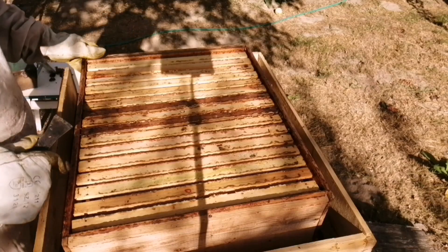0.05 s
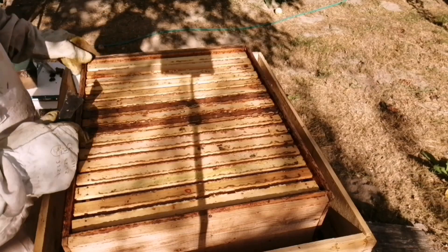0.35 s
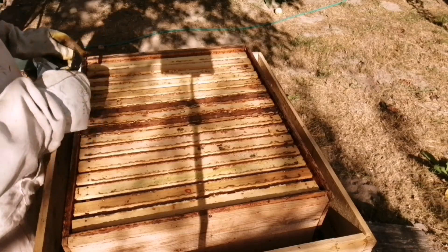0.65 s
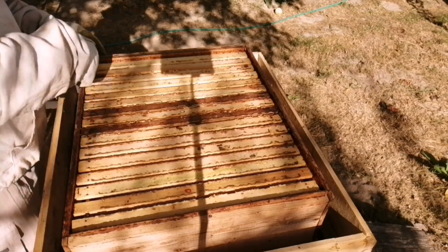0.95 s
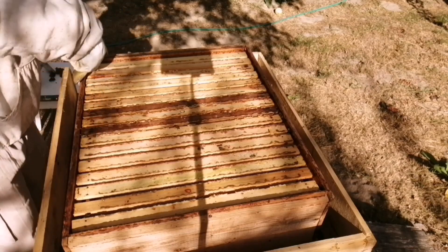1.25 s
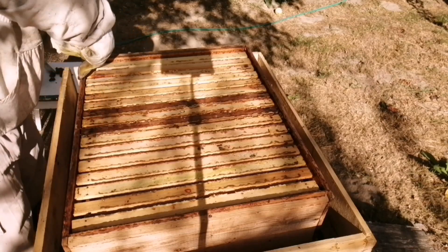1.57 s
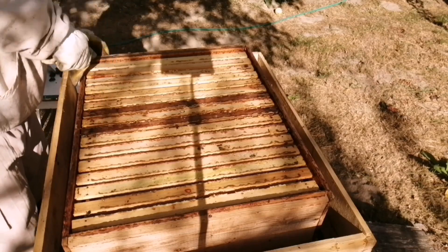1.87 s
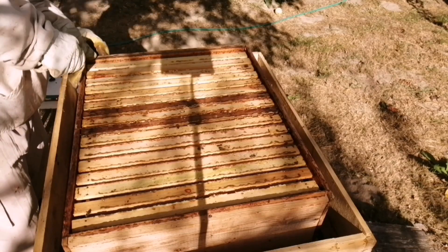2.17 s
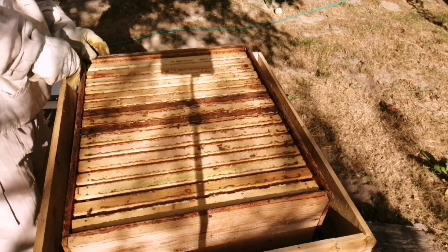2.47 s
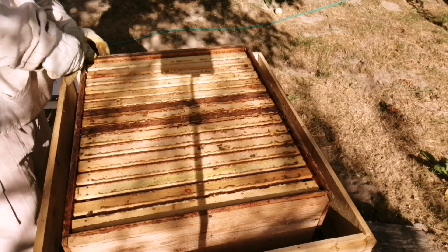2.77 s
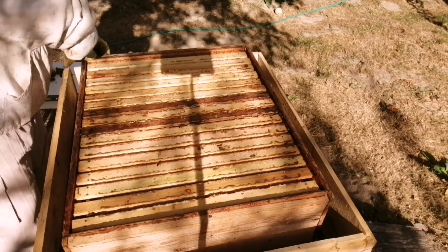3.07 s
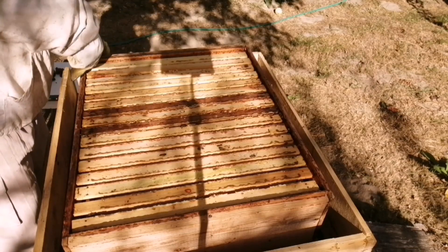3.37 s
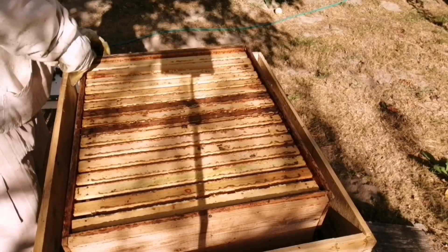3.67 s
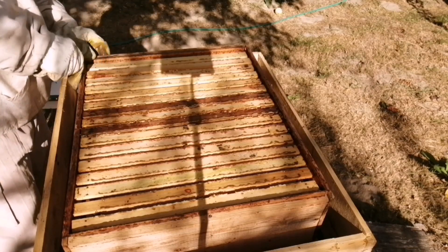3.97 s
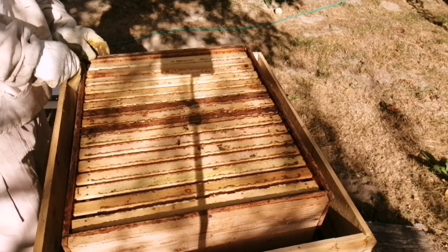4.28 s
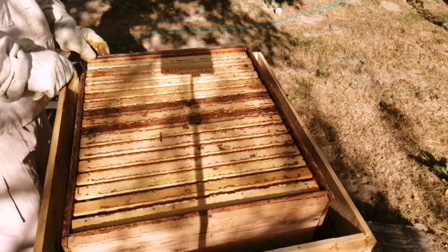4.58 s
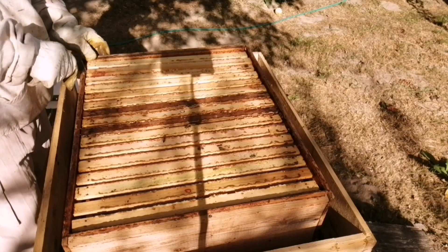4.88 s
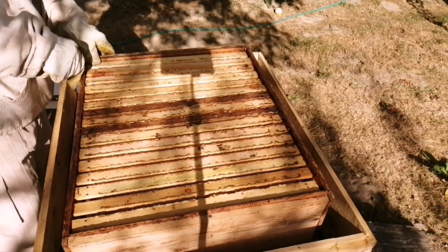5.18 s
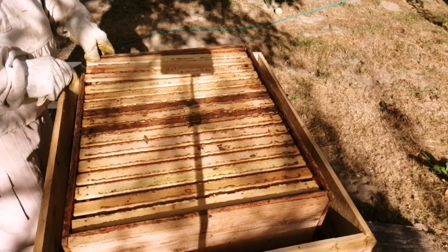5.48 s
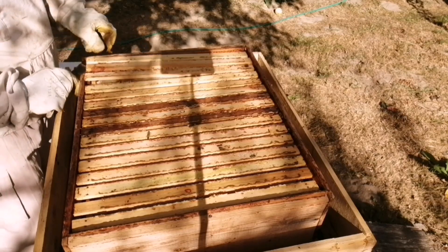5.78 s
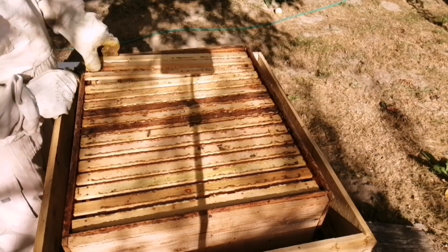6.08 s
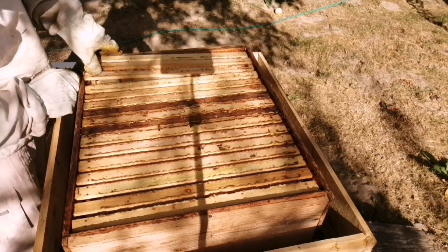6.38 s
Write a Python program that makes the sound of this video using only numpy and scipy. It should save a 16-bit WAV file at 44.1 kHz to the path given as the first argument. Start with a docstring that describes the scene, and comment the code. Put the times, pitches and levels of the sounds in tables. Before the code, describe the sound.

Outdoors, bees murmur softly under the fast, high chirping and dry rasping of grass insects. Close by, a steel tool works frames free in a wooden hive: a cluster of crisp snaps, a louder double crack, a dull thump from the box, then a last sharp knock. The low hum slowly fades while the insects carry on, with small puffs of wind on the microphone and a soft background rush.

```python
"""A beekeeper prises wooden frames loose in an open hive on dry summer grass.
The bee glue (propolis) snaps and sets the steel tool ringing, the frames drag and knock and the hollow
box thumps. Beating wings make the colony murmur over a low hum. A bush cricket and a grasshopper
call in the crackling grass, and a dry, high rasp swells briefly now and then.
Light wind rumbles on the microphone over a soft background rush."""
import sys
import numpy as np
from scipy import signal
from scipy.fft import rfft, irfft
from scipy.io import wavfile

SR = 44100
rng = np.random.default_rng(int(sys.argv[2]) if len(sys.argv) > 2 else 0)


def wav_record(signal):
    """Record a signal, one row per channel, as 16-bit PCM in the file named by sys.argv[1]."""
    frames = np.transpose(np.atleast_2d(signal))
    bounded = np.clip(frames, -1, 1)
    # unit amplitude maps onto the largest positive 16-bit level
    quanta = np.round(bounded * 32767).astype(np.int16)
    wavfile.write(sys.argv[1], SR, quanta)


N = 288395
T = np.arange(N) / SR


# The snaps' tone colour, with a bright microphone peak near 15 kHz.
# Each row: frequency in Hz, level in dB.
SNAP_SPECTRUM = [(300, -3.5), (1000, 5), (1800, 0), (3100, 3.5), (4000, -0.5), (5200, 7), (7200, 1.5),
                 (9000, -9.5), (12000, -5), (14000, -9), (15100, 3), (15800, -7)]
# The steel tool's ringing tones. Each row: pitch in Hz, level in dB, ring time in seconds if not held.
TOOL_MODES = [(5210, -5.5, 0.028), (5160, -18, 0.022), (3300, -20, 0.068), (7180, -6, 0.035)]
# The snaps. Each row: start in seconds, level in dB, seconds to fade by 60 dB, extra treble in dB.
SNAPS = [(2.518, -42, 0.018, 5), (2.5296, -28, 0.016, 4), (2.578, -41.5, 0.0098, -2),
         (2.8175, -24.5, 0.038, 2.5), (2.880, -24, 0.012, 4), (4.0841, -24.5, 0.015, -2),
         (4.1171, -13.5, 0.0095, -3), (4.128, -39, 0.014, -5), (4.136, -47, 0.016, -11),
         (4.475, -66, 0.012, -2), (4.931, -44.5, 0.13, -18), (5.81, -32, 0.038, -6), (6.149, -42, 0.011, 3)]
# A loose frame drags along its ledge. Each row: start in seconds, end in seconds, level in dB.
FRAME_DRAGS = [(2.813, 2.892, -49), (4.09, 4.137, -44)]

def propolis(rise_s=.0009, treble_hz=8500, scatter_db=-36.5, scatter_t60=.19):
    """Brittle glue snaps in bursts of grainy noise, the tool rings and the freed frame drags."""
    out, age = np.zeros((2, N)), np.arange(SR // 4) / SR
    grain = rms_one(noise(SNAP_SPECTRUM) * from_db(1.5 * drift(500)))
    treble = signal.sosfiltfilt(signal.butter(2, treble_hz, "high", fs=SR, output="sos"), grain)
    rise = 1 - np.exp(-(age / rise_s) ** 2)
    for s, db, t60, treble_db in SNAPS:
        part = slice(round(s * SR), round(s * SR) + len(age))
        burst = grain[:, part] + (from_db(treble_db) - 1) * treble[:, part]
        scatter = from_db(scatter_db - 60 * age / scatter_t60)  # off the hive walls and the ground
        fade = from_db(-60 * age / t60) + scatter
        tool = struck(TOOL_MODES, age, colour_db=-5.5, vary_db=7.5, rise_s=rise_s, ring_scale=.65)
        add(out, s, from_db(db) * (burst * rise * fade + tool))
    for start, end, db in FRAME_DRAGS:
        attack = np.clip((T - start) / .004, 0, 1)
        release_db = -60 * np.clip((T - end) / .068, 0, 2)
        out += grain * attack * from_db(db + release_db)
    return out


# A frame's ringing tones. Each row: pitch in Hz, level in dB, ring time in seconds if not held.
FRAME_MODES = [(233, -14, 0.2), (292, -4.5, 0.15), (364, 1.5, 0.1), (421, -9, 0.1), (542, -4, 0.12),
               (635, 19.5, 0.015), (727, -4.5, 0.084), (810, -2.5, 0.12), (914, -1.5, 0.12),
               (947, -6.5, 0.12), (1088, -13, 0.23), (1324, -1.5, 0.055), (1654, -1, 0.046),
               (1837, 2.5, 0.057), (2140, -7, 0.12), (2456, -6, 0.12), (3116, -3, 0.087)]
# The knocks. Each row: start in seconds, level in dB, tilt in dB per octave, most excited pitch in Hz,
# its boost in dB, how much the grip multiplies the ring time, left minus right in dB.
FRAME_KNOCKS = [(2.089, -63, 1.5, 2050, 8, 0.9, 0), (2.148, -59.5, 4, 1080, 18, 0.64, -2),
                (2.529, -51, -2, 1870, 11, 0.66, 2), (2.819, -42, 0, 930, 11.5, 0.43, 2),
                (2.826, -55.5, -8, 300, 5, 0.93, 2), (2.881, -36.5, -2, 976, 10.5, 0.38, 0),
                (2.888, -54, -9, 269, 12.5, 1.03, 4.5), (3.169, -51, -7.5, 930, 15.5, 0.47, 1),
                (3.172, -52.5, -6.5, 327, 10.5, 0.63, -2), (4.085, -33.5, -2, 920, 7, 0.51, 5),
                (4.089, -39.5, -5.5, 322, 14.5, 0.61, 1), (4.118, -26.5, -3, 717, 13.5, 0.26, 1),
                (4.121, -36.5, -3, 574, 12.5, .6, 0), (4.926, -47, -6.5, 770, 14, 0.64, 3),
                (4.929, -43.5, -5, 306, 9.5, 0.71, 1), (5.814, -32.5, 1, 1580, 10, 0.18, -0.5),
                (5.820, -45, -2, 295, 8, 0.64, 1)]

def frame_knocks(grip_shift=.008, build_cycles=1.29):
    """A frame hits its ledge and rings. Low tones take longer to build up, so the high ones come first."""
    out, age = np.zeros((2, N)), np.arange(SR // 6) / SR
    for s, db, tilt_db, centre_hz, boost_db, grip, side_db in FRAME_KNOCKS:
        # the grip shifts each pitch a little from knock to knock
        modes = [(hz * (1 + grip_shift * rng.standard_normal()), level, t60)
                 for hz, level, t60 in FRAME_MODES]
        modes += crowded_modes()
        hz = np.array(modes)[:, :1]
        # a harder contact tilts the ring towards its higher tones
        colour_db = tilt_db * np.log2(hz / 800) + contact_boost(modes, centre_hz, boost_db)
        ring = struck(modes, age, colour_db, vary_db=1, rise_s=build_cycles / hz, ring_scale=grip)
        add(out, s, from_db(db) * ring * panned(side_db))
    return out


def crowded_modes(count=26, low_hz=514, high_hz=3398, db=-11, t60=.088):
    """The frame's many weak middle tones, different at every contact."""
    places = (np.arange(count) + rng.random(count)) / count
    return [(low_hz + (high_hz - low_hz) * place, db, t60) for place in places]


# The box's tones. Each row: pitch in Hz, level in dB, ring time in seconds before ring_scale.
BOX_MODES = [(85, 3, 0.26), (139, -2, 0.22), (161.5, 6, 0.17), (212, 13.5, 0.078), (305, 16, 0.037)]
# Jolts to the box. Each row: start in seconds, level in dB, most excited pitch in Hz.
BOX_JOLTS = [(2.53, -70, 280), (2.887, -66, 230), (3.169, -58, 230), (4.122, -51.5, 136), (4.74, -62.5, 90),
             (4.926, -42.5, 85), (5.817, -47, 145), (5.848, -62, 130)]

def box_thumps():
    """The hollow box answers each jolt with a slow, low thump."""
    out, age = np.zeros((2, N)), np.arange(SR // 4) / SR
    for s, db, centre_hz in BOX_JOLTS:
        colour_db = contact_boost(BOX_MODES, centre_hz, boost_db=7)
        thump = struck(BOX_MODES, age, colour_db, vary_db=2.5, rise_s=.011, ring_scale=.9)
        add(out, s, from_db(db) * thump)
    return out * panned(2)


# The tones in a bee's buzz. Each row: multiple of the wingbeat rate, level in dB.
WING_HARMONICS = [(1, -1.5), (2, -1), (3, -6.5), (4, -9), (5, -14), (6, -15)]

def bees(count, spread, wander, flutter_db, wingbeat_hz=244.8):
    """Each bee beats its wings at its own wandering pitch and swells as it moves."""
    out, turn = np.zeros((2, N)), np.arange(1024) / 1024
    for offset in np.linspace(-1, 1, count):
        hz = wingbeat_hz * (1 + spread * offset * abs(offset) + wander * drift(4))
        one_beat = sum(from_db(db) * np.sin(2 * np.pi * (multiple * turn + rng.random()))
                       for multiple, db in WING_HARMONICS)
        beats = np.cumsum(hz) / SR
        wing = one_beat[(beats * len(turn)).astype(int) % len(turn)]
        out += wing * from_db(flutter_db * drift(3.75)) * panned(rng.normal(0, 5))
    buzz = rms_one(out)
    cavity = rms_one(resonance(buzz, hz=510, width_hz=170))  # the gaps between the combs boost one band
    return rms_one(buzz + .1 * cavity)


# The low hum swells, then fades. Each row: time in seconds, level in dB.
HUM_LEVEL = [(0, -69.5), (0.7, -67.5), (2.1, -65.5), (2.8, -69.5), (6.54, -74)]

def hum(hz=150.7, waver_hz=.4):
    """A low, nearly pure tone that wavers a little."""
    turns = np.cumsum(hz + waver_hz * drift(5.5)) / SR
    tone = np.sqrt(2) * np.sin(2 * np.pi * turns)
    return tone * from_db(in_time(HUM_LEVEL)) * panned(-4.5)


# The cricket's pace. Each row: time in seconds, chirps per second.
CHIRP_RATE = [(0, 11.12), (1.5, 11.07), (2.2, 10.7), (2.5, 9.35), (2.75, 11.45), (4.2, 11.2), (5.8, 11.27),
              (6.54, 11)]

def cricket(hz=9220, width_hz=1300):
    """A bush cricket makes its wing ring with two quick strokes per chirp."""
    turns = np.cumsum(in_time(CHIRP_RATE)) / SR
    strokes = pulse(turns, centre=.14, width=.038) + pulse(turns, centre=.441, width=.038)
    scrape = rng.standard_normal((2, N))
    wing = rms_one(resonance(resonance(scrape, hz, width_hz), hz, width_hz))
    return wing * strokes * from_db(2.4 * drift(22)) * panned(10)


# The tone colour of a dry, high rasp. Each row: frequency in Hz, level in dB.
RASP_SPECTRUM = [(2000, -11.5), (2900, 4), (3400, 2.5), (3900, -7), (5100, 4), (6500, 0.5), (7200, 6.5),
                 (7900, -1), (8700, 6.5), (10000, 5.5), (12300, -2.5), (14000, -4), (15000, 4.5),
                 (15800, -13)]
# The grasshopper's pace. Each row: time in seconds, strokes per second.
STROKE_RATE = [(0, 13.3), (1.1, 13.15), (1.4, 12.85), (2.3, 12.95), (2.7, 13.3), (4.4, 13.15), (6.54, 13.4)]
# How hard it rasps. Each row: time in seconds, level in dB.
STROKE_LEVEL = [(0, -58), (1.2, -55), (2.4, -57.5), (3.4, -57), (4.5, -60), (5.4, -58), (6.54, -56.5)]

def grasshopper(jitter_cycles=.08, rest_depth=.65, skip_depth=.7):
    """A leg rasps along the wing in uneven strokes, eases off between them and now and then skips."""
    turns = np.cumsum(in_time(STROKE_RATE)) / SR + jitter_cycles * drift(27)
    strokes = (1 - rest_depth * pulse(turns, centre=.39, width=.15)) * from_db(drift(44))
    contact = 1 - skip_depth * np.clip(2 * drift(30) - 1, 0, 1)
    teeth = noise(RASP_SPECTRUM) * from_db(1.5 * drift(44))
    return rms_one(teeth * strokes * contact) * from_db(in_time(STROKE_LEVEL)) * panned(.3)


# Brief louder swells in the dry, high rasp. Each row: time of the peak in seconds, level in dB.
RASP_PEAKS = [(0.279, -54), (1.513, -50), (2.738, -51), (3.055, -54), (3.413, -57), (4.377, -50.5),
              (4.751, -48.5), (5.36, -49.5), (6.057, -53), (6.472, -49.5)]

def rasp_swells(floor_db=-70.5):
    """A dry, high rasp flickers faintly all the time and swells briefly now and then."""
    swells = sum(from_db(db) * swell(s, rise_s=.0043, fall_s=.0094) for s, db in RASP_PEAKS)
    flicker = from_db(floor_db + 3 * drift(31))
    return (swells + flicker) * noise(RASP_SPECTRUM)


def crackle(ticks_per_s=60, spread_db=3, t60=.012):
    """Dry grass and cloth give tiny ticks at random moments, a few standing out."""
    sizes = from_db(spread_db * np.minimum(rng.exponential(1, N), 3))
    ticks = sizes * (rng.random(N) < ticks_per_s / SR)
    fades = signal.lfilter([1], [1, -from_db(-60 / (t60 * SR))], ticks + 1e-18)
    return rms_one(fades * noise(SNAP_SPECTRUM))


# The wind's rumble. Each row: frequency in Hz, level in dB.
WIND_SPECTRUM = [(15, -5.5), (35, 7), (70, -2.5), (110, -10), (200, -21), (500, -72)]
# The breeze. Each row: time in seconds, level in dB before lift_db is added.
BREEZE_LEVEL = [(0.0, -58.5), (0.84, -71), (1.69, -72), (2.26, -75), (2.64, -64.5), (3.68, -67.5),
                (4.35, -65.5), (5.1, -80), (6.54, -72.5)]
# Single puffs. Each row: time of the peak in seconds, level in dB.
WIND_PUFFS = [(0.01, -53), (0.11, -45.5), (0.51, -62), (1.49, -51), (2.51, -55.5), (2.62, -51), (3.02, -64),
              (3.37, -57), (3.92, -56.5), (4.28, -53.5), (4.6, -53.5)]

def wind(lift_db=4.5, eddy_db=2, lumps_db=1.5):
    """A swirling breeze and short puffs hit the microphone and make a lumpy rumble."""
    breeze = from_db(in_time(BREEZE_LEVEL) + lift_db + eddy_db * drift(.55))
    puffs = sum(from_db(db) * swell(s, rise_s=.032, fall_s=.028) for s, db in WIND_PUFFS)
    rumble = rms_one(noise(WIND_SPECTRUM) * from_db(lumps_db * drift(25)))
    return np.hypot(breeze, puffs) * rumble * panned(1.5)


# A soft background rush. Each row: frequency in Hz, level in dB; little is heard near 4 kHz.
RUSH_SPECTRUM = [(60, -6), (130, 4), (350, 4), (620, 0.5), (1000, -3.5), (1500, -5.5), (2000, -9),
                 (2900, -2), (3400, -25), (3900, -63), (5000, -7.5)]
# The hiss of far-off insects. Each row: frequency in Hz, level in dB.
HISS_SPECTRUM = [(3000, -30), (4200, -10), (5200, 0), (9300, 6), (12500, -7), (15000, -1), (15800, -8)]

def background(rush_db=-60.5, insects_db=-64):
    """A soft, flickering rush and the steady hiss of far-off insects."""
    rush = noise(RUSH_SPECTRUM) * from_db(rush_db + 2.05 * drift(31))
    return rush + from_db(insects_db) * noise(HISS_SPECTRUM)


# How alike left and right sound. Each row: frequency in Hz, likeness (1 means the same).
STEREO_LIKENESS = [(30, 0.065), (150, 0.8), (300, 0.93), (700, 0.47), (2000, 0.17), (5000, 0.043),
                   (15000, 0.058)]

def noise(spectrum, top_hz=15800):
    """Stereo noise of a given colour at power 1, most alike on both sides near 300 Hz."""
    hz = np.arange(N // 2 + 1) * SR / N
    mid, side = rfft(rng.standard_normal((2, N)))
    alike = at_hz(STEREO_LIKENESS, hz)
    both = np.sqrt(1 + alike) * mid + np.sqrt(1 - alike) * side * [[1], [-1]]
    return rms_one(irfft(both * from_db(at_hz(spectrum, hz)) * (hz < top_hz), N))


def struck(modes, age, colour_db, vary_db, rise_s, ring_scale):
    """A struck object rings with its own tones (modes). Ring time, t60, is the time to fade by 60 dB."""
    hz, db, t60 = np.transpose(modes)[:, :, None]
    gain = from_db(db + colour_db + vary_db * rng.standard_normal(hz.shape))
    # the tones reach left and right out of step
    apart = np.arccos(at_hz(STEREO_LIKENESS, hz)) * rng.choice([-.5, .5], hz.shape)
    phase = 2 * np.pi * (hz * age + rng.random(hz.shape))
    rise = 1 - np.exp(-(age / rise_s) ** 2)
    fade = from_db(-60 * age / (t60 * ring_scale))
    return np.array([(gain * rise * fade * np.sin(phase + side * apart)).sum(0) for side in (1, -1)])


def contact_boost(modes, centre_hz, boost_db, octaves=.19):
    """Extra dB for each tone: the spot that is hit favours those near one pitch."""
    return boost_db * np.exp(-(np.log2(np.array(modes)[:, :1] / centre_hz) / octaves) ** 2)


def resonance(x, hz, width_hz):
    """A filter that rings at one pitch."""
    r = np.exp(-np.pi * width_hz / SR)
    return signal.lfilter([1, 0, -1], [1, -2 * r * np.cos(2 * np.pi * hz / SR), r * r], x)


def drift(hz):
    """A smooth random wobble of size about 1; more hz makes it quicker."""
    r = np.exp(-80 * np.pi * hz / SR)
    steps = rng.standard_normal(N // 40 + 2002)  # one for every 40 samples
    slow = signal.lfilter([1], [1, -2 * r, r * r], steps)[2000:]
    return np.interp(np.arange(N) / 40, np.arange(len(slow)), rms_one(slow))


def pulse(turns, centre, width):
    """One smooth bump in every cycle."""
    return np.exp(-.5 * (((turns - centre + .5) % 1 - .5) / width) ** 2)


def swell(s, rise_s, fall_s):
    """A smooth bump of height 1 that peaks at time s."""
    return np.exp(-.5 * np.minimum(abs(T - s) / np.where(T < s, rise_s, fall_s), 10) ** 2)


def in_time(rows):
    """A curve's value at every sample."""
    return np.interp(T, *np.transpose(rows))


def at_hz(points, hz):
    """Read a spectrum between its rows, on an octave scale."""
    f, value = np.transpose(points)
    return np.interp(np.log(np.maximum(hz, 1)), np.log(f), value)


def from_db(db):
    """Decibels to gain."""
    return 10 ** (np.asarray(db) / 20)


def rms_one(x):
    """Scale to an average power of 1."""
    return x / np.sqrt(np.mean(x ** 2) + 1e-20)


def panned(side_db):
    """Left and right gains, with the left louder by side_db."""
    return from_db(np.array([[.5], [-.5]]) * side_db)


def add(out, s, sound):
    """Mix a sound in from time s."""
    start = round(s * SR)
    out[:, start:start + sound.shape[1]] += sound


def scene():
    """The beekeeper and the hive in front; insects, wind and a soft rush behind."""
    keeper = propolis() + frame_knocks() + box_thumps()
    rasp = rasp_swells()
    colony = from_db(-65.5) * bees(count=8, spread=.12, wander=.03, flutter_db=2.5) + hum()
    near_bees = from_db(-72) * bees(count=2, spread=.025, wander=.035, flutter_db=6)
    grass = from_db(-54) * cricket() + grasshopper() + from_db(-71) * crackle()
    return keeper + colony + near_bees + grass + rasp + wind() + background()


def record(dry):
    """Cut the rumble below 16 Hz and the treble above 15800 Hz."""
    dry = signal.sosfilt(signal.butter(2, 16, "high", fs=SR, output="sos"), dry)
    return signal.sosfilt(signal.ellip(10, .2, 70, 15800, fs=SR, output="sos"), dry)


dry = scene()
out = record(dry)
wav_record(out)
```